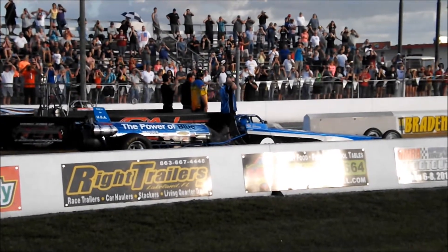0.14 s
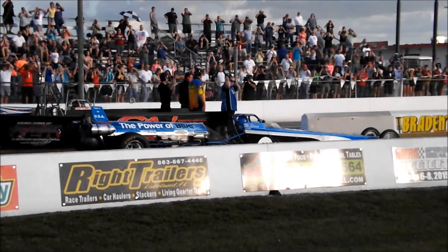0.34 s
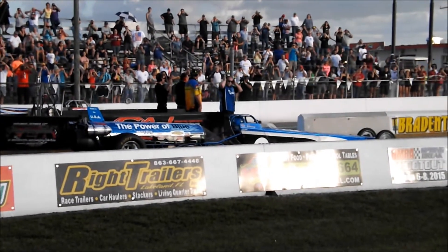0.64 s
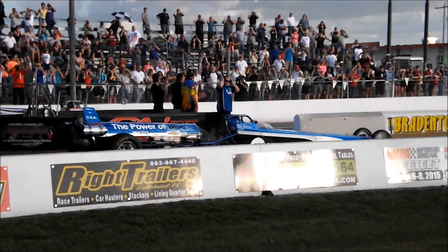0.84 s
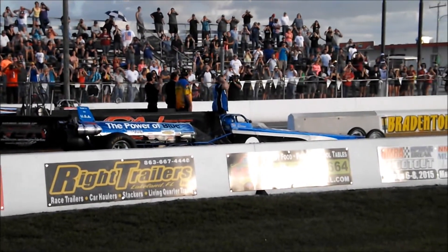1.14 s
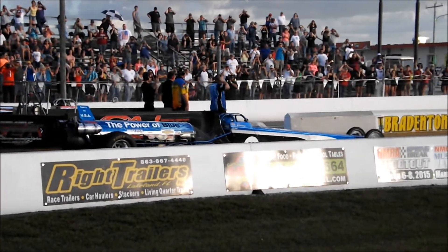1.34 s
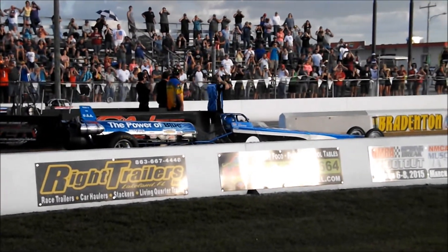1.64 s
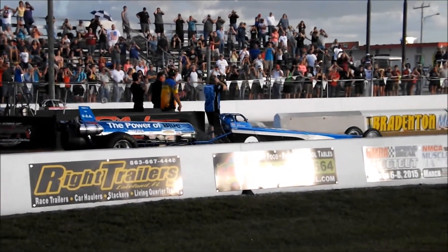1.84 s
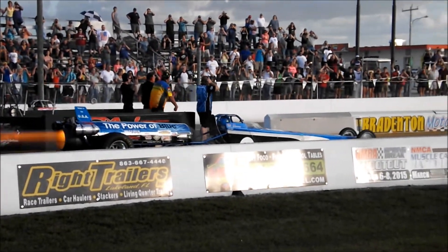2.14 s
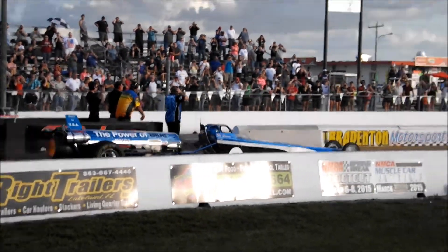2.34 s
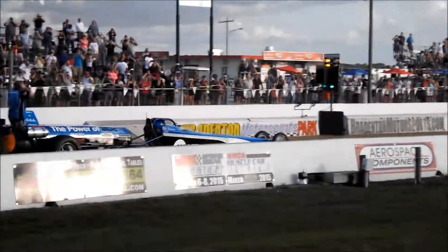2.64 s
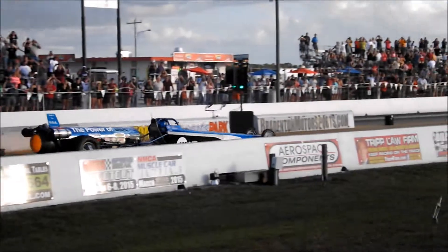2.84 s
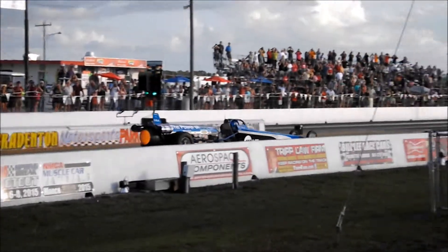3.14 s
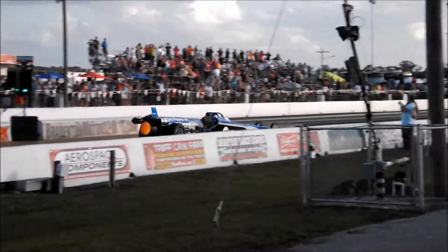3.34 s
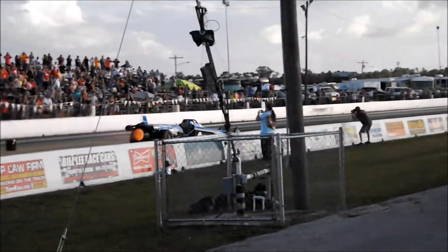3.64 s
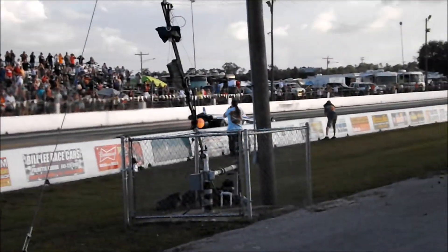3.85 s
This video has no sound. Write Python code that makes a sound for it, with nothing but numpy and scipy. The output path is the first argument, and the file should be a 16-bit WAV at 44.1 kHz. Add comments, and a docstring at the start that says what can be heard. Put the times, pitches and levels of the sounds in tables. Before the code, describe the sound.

Jet dragster engine rumbling and popping before its afterburner erupts into a distorted roar.

```python
"""Hissing, rumbling, crackling exhaust: a jet dragster waits at the start line, across the drag strip.
Its compressor howls and whines faintly as it spools up. The afterburner bangs three times, each bang
echoing from the stands, then lights fully and roars away. The microphone is a small mono one with a
ringing port, driven into hard clipping; under the roar its gain ducks briefly 15 times a second,
so the roar flutters."""
import sys
import numpy as np
from scipy import signal
from scipy.fft import rfft, irfft, next_fast_len
from scipy.io import wavfile
from scipy.ndimage import uniform_filter1d, map_coordinates

SR = 44100
rng = np.random.default_rng(int(sys.argv[2]) if len(sys.argv) > 2 else 0)


def persist_wave(psi):
    """Save psi, clipped to +-1, as 16-bit WAV."""
    counts = np.round(np.clip(psi, -1, 1) * 32767).astype(np.int16)
    wavfile.write(sys.argv[1], SR, np.atleast_2d(counts).T)


N = 176400

# Spectra of exhaust hiss, afterburner flame and ignition thump: (frequency [Hz], level per Hz [dB])
HISS_SPECTRUM = [(200, -38), (300, -8), (400, 1), (520, 0.5), (660, -3), (840, 4.5), (950, -2.5), (1060, 5),
                 (1200, 1.5), (1450, 5.5), (1900, -0.5), (2400, -2.5), (3300, -1.5), (4300, -2.5),
                 (5000, -3), (5500, -13), (6200, -5.5), (6800, 1.5), (7600, -3), (8600, -8.5),
                 (10000, -2.5), (11500, -11), (16000, -21.5)]
FLAME_SPECTRUM = [(20, 12.5), (60, 4), (200, 7), (600, 4.5), (1000, 4), (1400, 6), (2000, 2), (3300, 2.5),
                  (4300, 2), (6000, -6), (16000, -8)]
THUMP_SPECTRUM = [(15, -28), (30, -10), (70, -12), (130, -5), (210, -0.5), (270, -12), (400, -48)]
LAUNCH_S, RISE_S, THUMP_FALL_S = 2.2312, 0.0008, 0.024


def amp(db):
    return 10 ** (np.asarray(db) / 20)


def unit(x):
    return x / np.sqrt(np.mean(x ** 2) + 1e-20)


def curves(rows):
    """One value per sample for each column after the time."""
    times, *columns = np.transpose(rows)
    return [np.interp(np.arange(N) / SR, times, column) for column in columns]


def wobble(rate):
    """A smooth random curve, rate knots a second."""
    return map_coordinates(rng.standard_normal(int(N * rate / SR) + 4), [np.arange(N) * rate / SR])


def filtered(x, response):
    """x through a complex frequency response."""
    size = next_fast_len(N + 8192)
    return irfft(rfft(x, size) * response(np.fft.rfftfreq(size, 1 / SR)), size)[..., :N]


def noise(spectrum):
    """Noise of rms 1 in the colour of the spectrum."""
    freqs, db = np.transpose(spectrum)
    return unit(filtered(rng.standard_normal(N),
                         lambda hz: amp(np.interp(np.log(hz + 1), np.log(freqs + 1), db, -120, -120))))


def noise_band(centre_hz, width_hz):
    """Noise of rms 1 around one resonance."""
    return unit(filtered(rng.standard_normal(N),
                         lambda hz: 1 / (1 + (2 * (hz - centre_hz) / width_hz) ** 2)))


def burst(start_s, hold_s, fall_s):
    """Envelope: a fast rise, held until hold_s after the start, then an exponential fall."""
    t = np.arange(N) / SR - start_s
    return np.clip(t / RISE_S, 0, 1) * np.exp(-np.clip(t - hold_s, 0, None) / fall_s)


def background_hiss():
    """A faint, steady treble hiss behind everything."""
    # Colour of the hiss: (frequency [Hz], level per Hz [dB])
    spectrum = [(2000, -20), (5000, 0), (7000, 3), (10000, 6), (16000, 4)]
    return amp(-47) * noise(spectrum)


def compressor_whine():
    """A faint wavering tone, rising as the engine spools up."""
    # Compressor tone: (time [s], pitch [Hz], level [dB])
    glide = [(0, 7680, -54), (.25, 7700, -52), (.45, 7820, -54), (.6, 7970, -54), (.9, 8150, -55),
             (1.1, 8230, -54), (1.3, 8430, -53), (1.45, 8600, -57), (1.9, 8900, -66)]
    hz, db = curves(glide)
    level = amp(db + 3.2 * wobble(25))
    return level * np.sin(2 * np.pi * np.cumsum(hz + 14 * wobble(60)) / SR)


def intake_howl():
    """A narrow band of noise at the intake that climbs as the engine spools up."""
    # Path of the band: (time [s], centre [Hz], level [dB])
    glide = [(0, 3130, -48), (.45, 3200, -49.5), (.7, 3350, -48), (1.1, 3470, -49.5), (1.9, 3500, -47),
             (2.2, 3430, -39.5)]
    hz, db = curves(glide)
    in_phase, quadrature = [noise_band(0, width_hz=390) for _ in range(2)]
    phase = 2 * np.pi * np.cumsum(hz) / SR
    return amp(db) * (in_phase * np.cos(phase) + quadrature * np.sin(phase))


def crackles():
    """Short pitched, fizzing spits in the exhaust: loud ones at set times, fainter ones at random."""
    # The loud spits: (time [s], level [dB])
    spits = [(0.637, -38), (0.7765, -36), (0.841, -33), (0.877, -38), (0.9104, -36), (0.9236, -35),
             (0.9552, -37), (1.0235, -33), (1.0955, -35), (1.1405, -36), (1.187, -39), (1.5534, -37),
             (1.573, -36), (1.5894, -37), (1.6024, -37), (2.048, -29), (2.067, -29), (2.102, -30),
             (2.136, -30), (2.217, -30)]
    faint_per_s, peak_s, ring_hz = 18, 0.0012, 3402
    kicks = (rng.random(N) < faint_per_s / SR) * amp(-44 + 2.36 * rng.standard_normal(N))
    for s, db in spits:
        kicks[round(s * SR)] = amp(db)
    t = np.arange(SR // 40) / SR
    envelope = t / peak_s * np.exp(1 - t / peak_s)
    ring = signal.fftconvolve(kicks, envelope * np.sin(2 * np.pi * ring_hz * t))[:N]
    fizz = signal.fftconvolve(kicks, envelope)[:N] * noise(HISS_SPECTRUM)
    return ring + 0.85 * fizz


def exhaust():
    """Turbulent hiss and low combustion rumble, both surging unevenly."""
    # Exhaust as the engine spools up: (time [s], hiss level [dB], rumble level [dB])
    spool = [(0, -39.5, -42.5), (.45, -38.5, -39), (.6, -38, -37.5), (.77, -34, -35), (.8, -40.5, -41),
             (.91, -34, -36.5), (.96, -36, -39.5), (1.1, -36.5, -35), (1.4, -32.5, -34.5),
             (1.65, -34.5, -34), (1.92, -36, -35), (1.97, -26, -25), (2.05, -25, -24), (2.12, -24.5, -25),
             (2.17, -26, -25.5), (2.22, -24.5, -28), (2.3, -22, -23)]
    hiss_db, rumble_db = curves(spool)
    surge_db = 1.32 * wobble(13) + 0.72 * wobble(60)
    hiss = amp(hiss_db + surge_db) * noise(HISS_SPECTRUM)
    # Colour of the rumble: (frequency [Hz], level per Hz [dB])
    rumble_spectrum = [(12, -39), (20, -9), (75, -6), (156, -2), (199, -5), (221, -0.5), (249, -7),
                       (308, -17), (330, -13), (430, -58), (730, -120)]
    return hiss + amp(rumble_db + 0.79 * surge_db + 0.57 * wobble(9.5)) * noise(rumble_spectrum)


def afterburner_bangs():
    """Each bang: a crack, a short burst of flame, a low thump and an echo from the stands."""
    # Brief ignitions: (time [s], flame level [dB], burn time [s], thump level [dB], echo level [dB])
    bangs = [(.4872, -13, 0.034, -23, -32), (1.456, -8.5, 0.063, -19, -28), (1.9307, -13, 0.035, -11, -33)]
    flame = thump = 0
    for s, flame_db, burn_s, thump_db, echo_db in bangs:
        crack = amp(-11) * burst(s, RISE_S, fall_s=0.0034)
        burn = amp(flame_db) * burst(s, burn_s, fall_s=0.004)
        echo = amp(echo_db) * burst(s, burn_s, fall_s=0.05)
        flame += crack + burn + echo
        thump += amp(thump_db) * burst(s, burn_s, THUMP_FALL_S)
    return flame * amp(0.57 * wobble(150)) * noise(FLAME_SPECTRUM) + thump * noise(THUMP_SPECTRUM)


def afterburner_roar():
    """The flame lights with a thump and stays on: its lower part surges and the tailpipe resonates."""
    # Full burn: (time [s], flame level [dB], bass gain [dB], middle gain [dB], tailpipe level [dB])
    launch = [(2.2312, -12, 11, 9, -40), (2.27, -13, -1, 1, -40), (2.33, -9, 4, 5, -33),
              (2.5, -5.5, -7, -2, -31), (2.8, -2, -3, 1, -17.5), (3.1, -6, -11, -1, -17.5),
              (3.3, -9, 2.5, 12.5, -20), (3.5, -9.5, 1.5, 3, -40), (3.7, -6.5, 6, 6.5, -34.5),
              (4, -9, 4.5, 2, -21)]
    flame_db, bass_db, mid_db, pipe_db = curves(launch)
    flame = noise(FLAME_SPECTRUM)
    bass, lower = [filtered(flame, lambda hz: 1 / (1 + (hz / edge_hz) ** 2)) for edge_hz in (526, 1810)]
    middle, treble = lower - bass, flame - lower
    surge = amp(1.65 * wobble(12) + 3.1 * wobble(55) + 1.6 * wobble(190))
    body = surge * (amp(bass_db) * bass + amp(mid_db) * middle)
    roar = amp(flame_db + 1.5 * wobble(150)) * (treble + body)
    tailpipe = amp(pipe_db) * noise_band(centre_hz=1464, width_hz=105)
    thump = amp(-16) * burst(LAUNCH_S - 0.0036, 0.016, THUMP_FALL_S) * noise(THUMP_SPECTRUM)
    return (roar + tailpipe) * burst(LAUNCH_S, hold_s=9, fall_s=1) + thump


def scene():
    """The dragster from across the strip, the same in both channels."""
    engine = exhaust() + compressor_whine() + intake_howl() + crackles()
    return np.tile(engine + afterburner_bangs() + afterburner_roar() + background_hiss(), (2, 1))


def record(dry):
    """The small microphone: its port rings, its gain ducks under the roar, it distorts and clips."""
    port_hz, port_width_hz = 3335, 427
    x = filtered(dry, lambda hz: port_hz ** 2 / (port_hz ** 2 - hz ** 2 + 1j * hz * port_width_hz))

    # From the launch on, the ducks come at a fixed beat; each is fully down lead_s before it ends.
    first_end_s, every_s = 2.2774, 0.06477
    attack_s, lead_s, release_s, window_s = 0.007, 0.0075, 0.0014, 0.014
    t = np.arange(N) / SR
    left_s = (first_end_s - t) % every_s
    duck = np.clip(np.minimum(left_s / release_s, 1 - (left_s - lead_s) / attack_s), 0, 1)
    duck *= t > LAUNCH_S
    # What a duck pulls the roar down to: (time [s], rms level [dB])
    duck_target = [(2.2, -12), (2.5, -6.5), (3, -4), (3.5, -11), (4, -13)]
    rms = np.sqrt(np.abs(uniform_filter1d(x ** 2, size=round(window_s * SR), axis=1)) + 1e-12)
    x = x * np.minimum(1, amp(curves(duck_target)[0]) / rms) ** duck

    clip_level, knee, sag_db, bias = 0.215, 4.6, -2, 0.004
    x = x + 0.97 * x ** 3 + 0.65 * np.clip(x, -clip_level, clip_level) ** 2 + bias
    ceiling = clip_level * amp(sag_db * duck)
    x = x / (1 + np.abs(x / ceiling) ** knee) ** (1 / knee)

    # The recorder's tone after clipping: (frequency [Hz], gain [dB])
    voicing = [(20, 1), (2000, 0), (4500, 0.18), (6000, -0.3), (8500, -0.9), (10000, -0.16), (11500, -0.9),
               (13000, -0.5), (16000, -2.5)]
    top_hz = 15800
    return filtered(x, lambda hz: amp(np.interp(hz, *np.transpose(voicing))) / (1 + (hz / top_hz) ** 300))


dry = scene()
out = record(dry)
persist_wave(out)
```